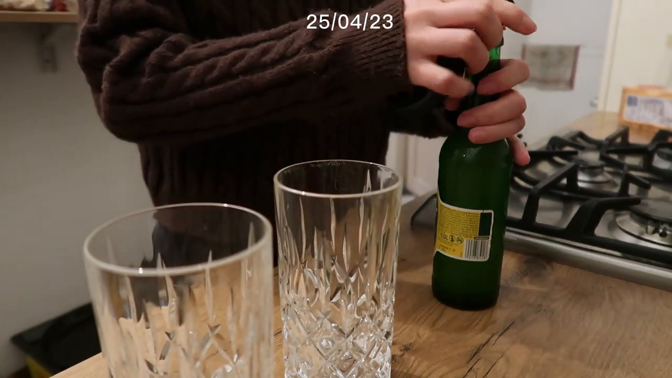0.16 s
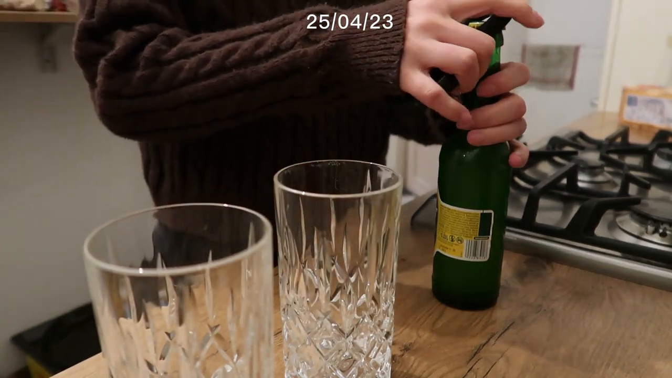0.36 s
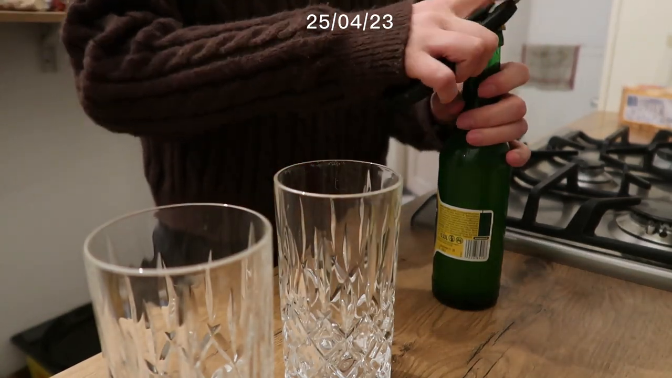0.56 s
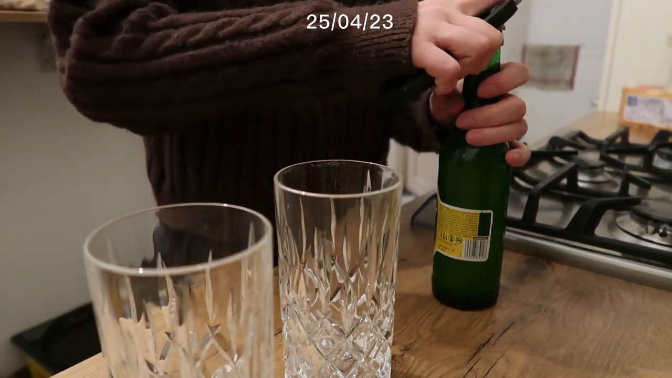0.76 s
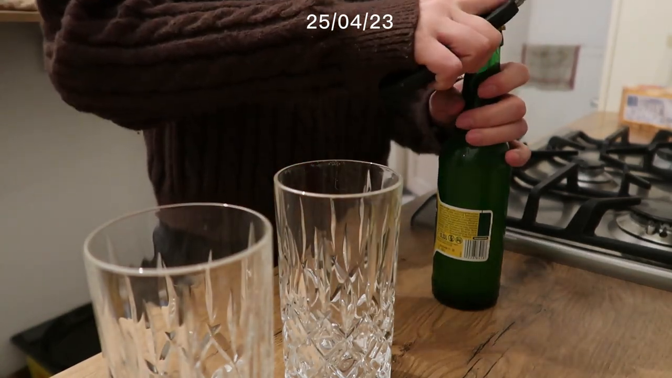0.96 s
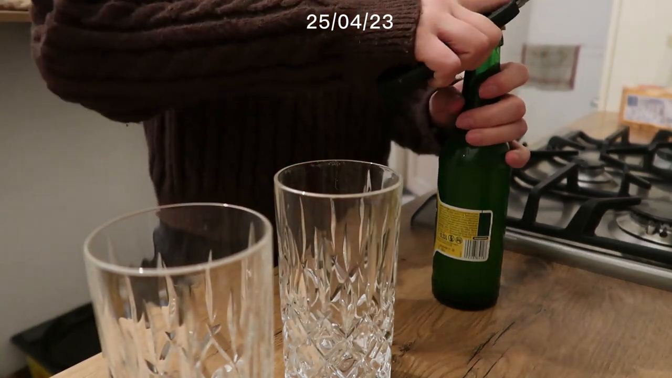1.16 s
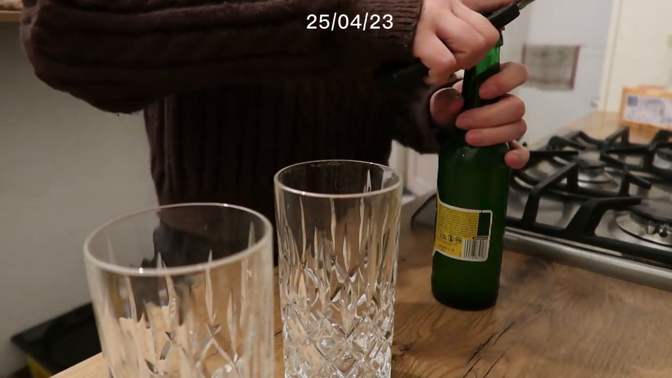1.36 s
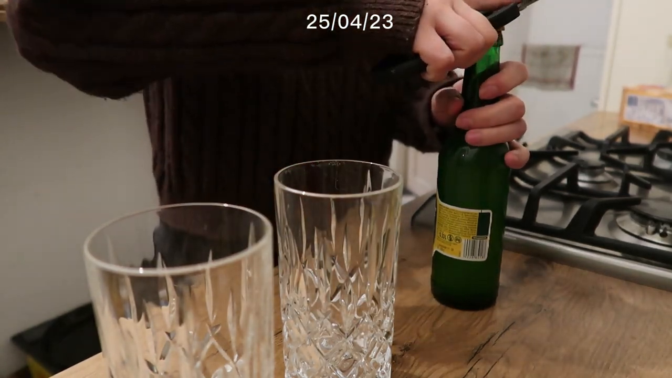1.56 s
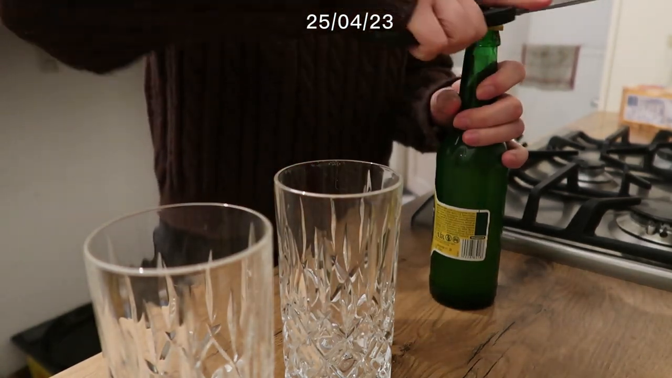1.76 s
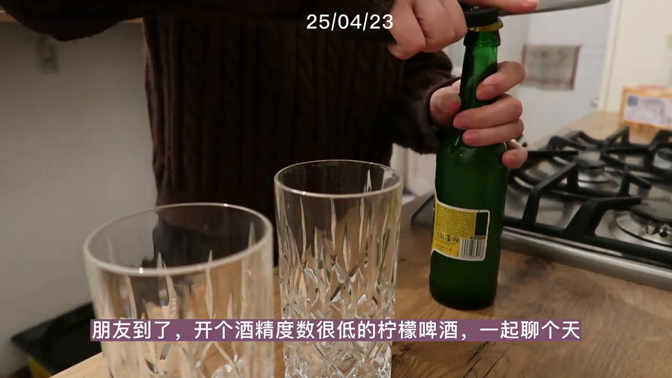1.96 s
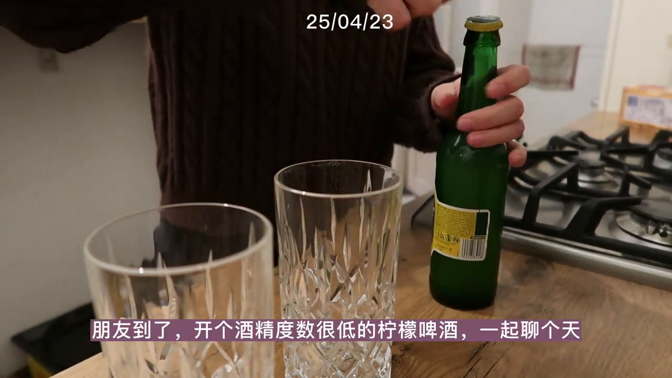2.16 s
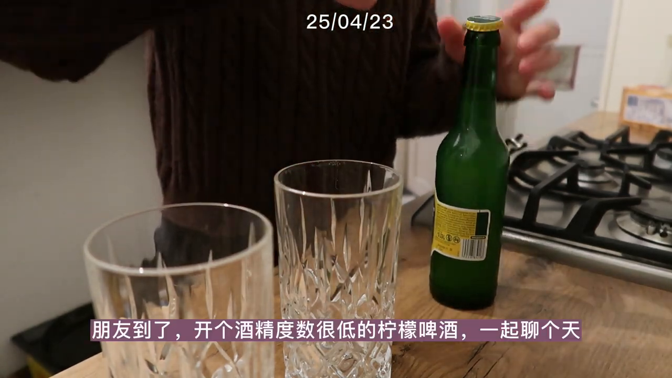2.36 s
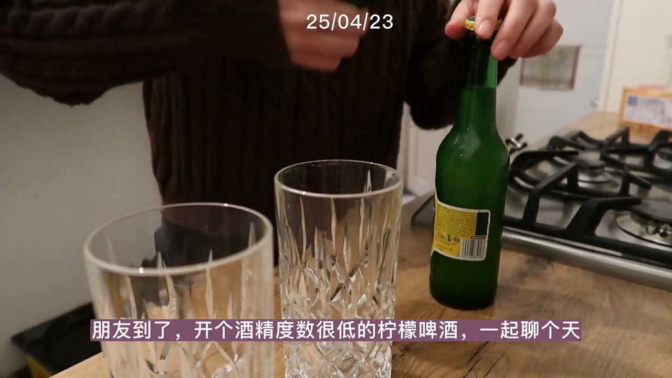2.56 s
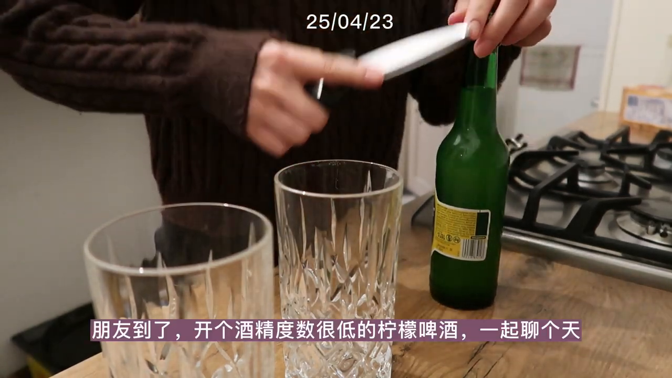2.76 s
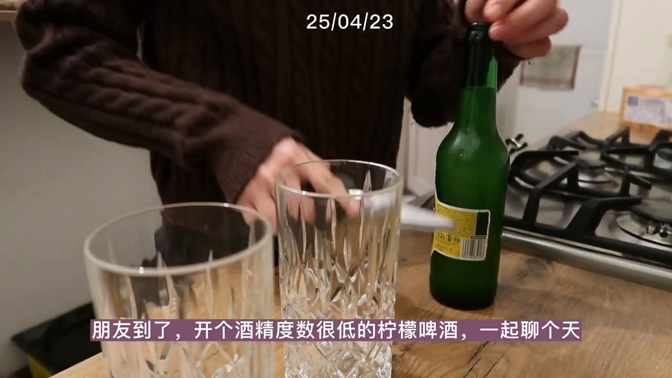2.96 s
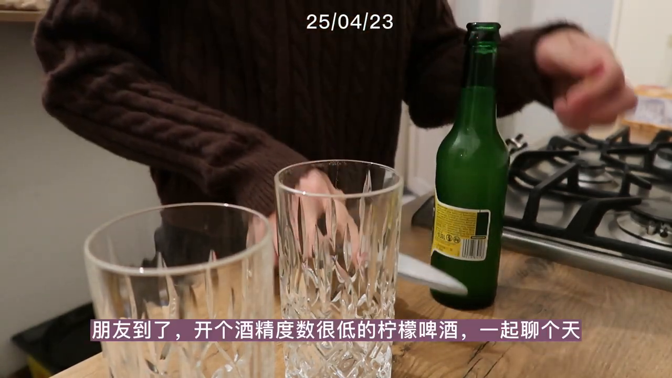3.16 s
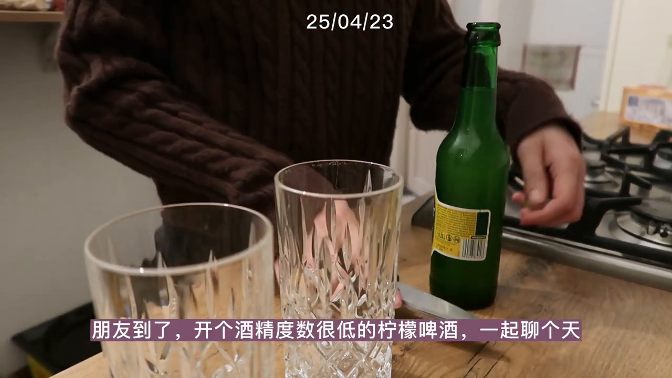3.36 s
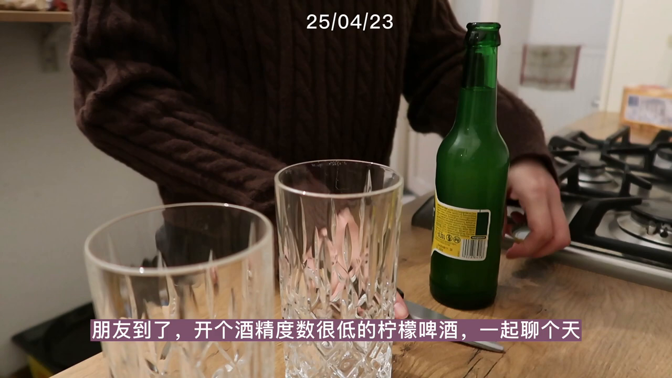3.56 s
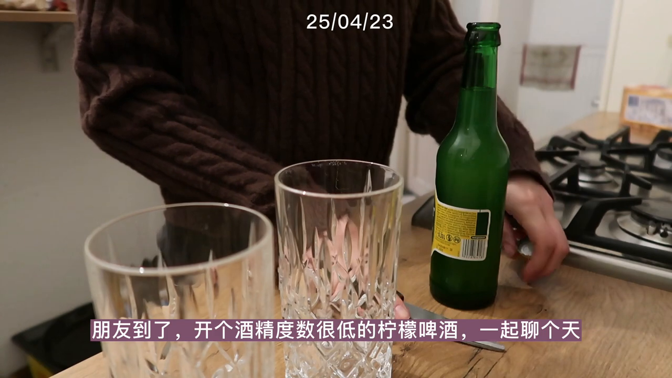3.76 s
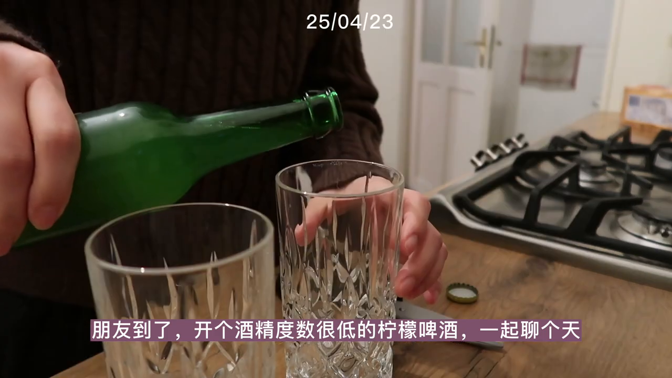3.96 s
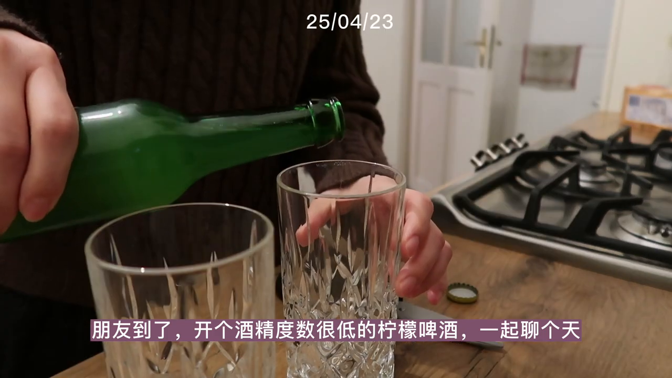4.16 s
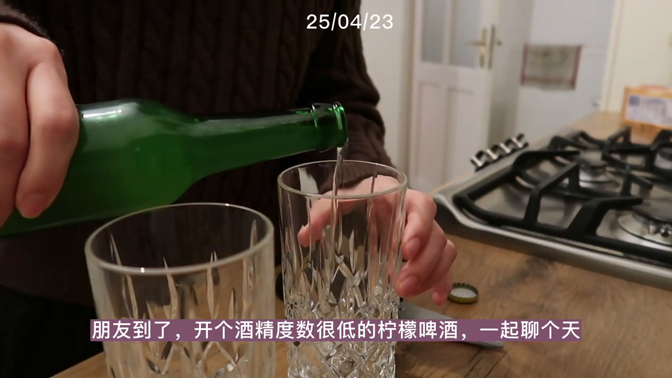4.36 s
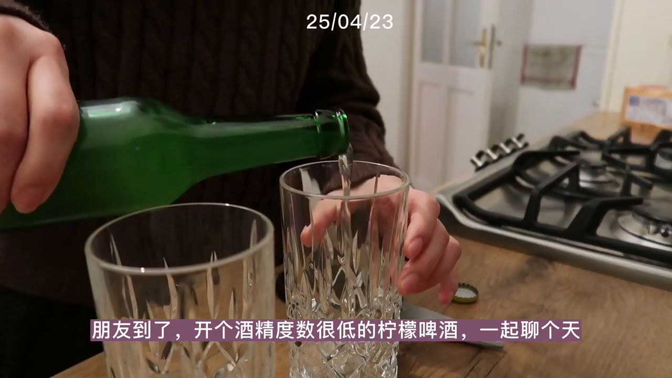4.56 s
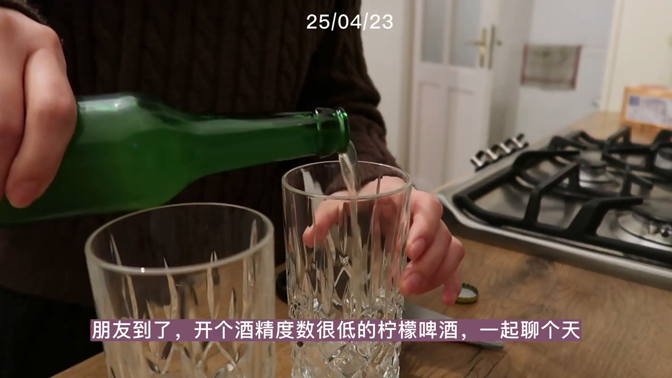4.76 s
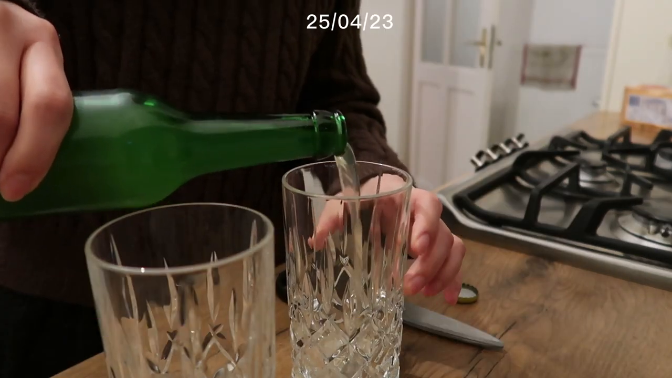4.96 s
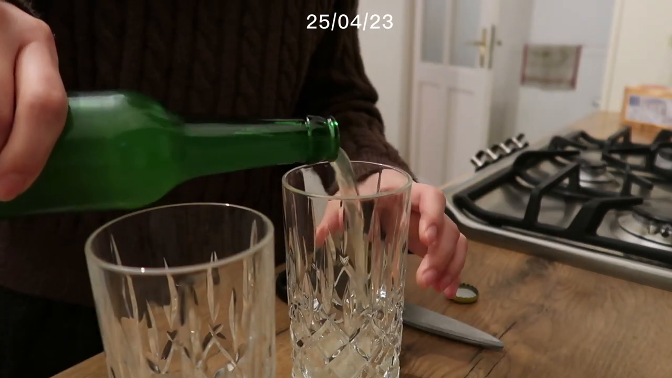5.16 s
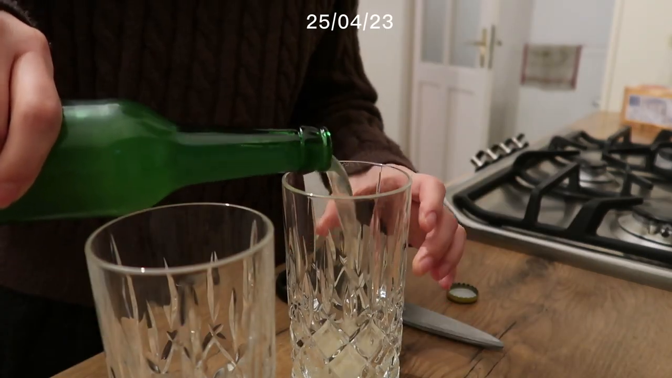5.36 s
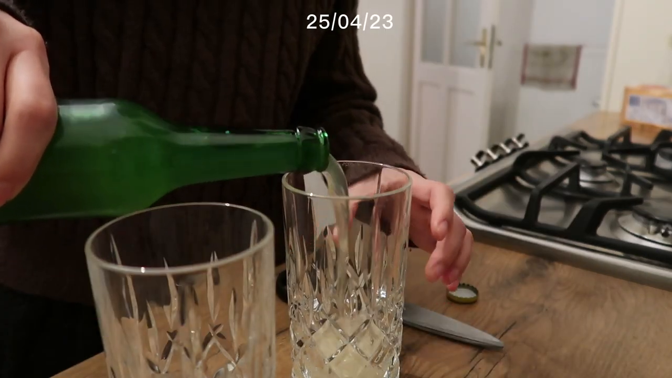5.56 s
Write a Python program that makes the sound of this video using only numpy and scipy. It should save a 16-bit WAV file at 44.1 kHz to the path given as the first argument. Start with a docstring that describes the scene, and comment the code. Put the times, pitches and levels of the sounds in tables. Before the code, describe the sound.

In a quiet kitchen, close stereo pickup: a glass bottle bumps dully on a wooden counter, then the cap is pried loose with a loud woody knock, steel ticks and a tiny gas hiss. After faint rubbing, a knife clatters down and settles. A sudden cut leads to rhythmic glugging into a tall glass, with plops, splashing and light fizz.

```python
"""A beer bottle on a wooden kitchen counter: its crown cap is levered off with a knife, then it glugs into a tall glass.
Opening: wood, steel and cap are struck modes; gas, soft rubbing and the shuffling base are coloured noise.
Pouring: the bottle rings at its neck and hums as an air spring, gulping about four times a second;
the glass holds ringing bubbles, splashing, a crackling trickle and the first fizz of the foam.
Close stereo pickup with a short room reverberation and quiet room noise."""
import sys
import numpy as np
from scipy import signal
from scipy.fft import rfft, irfft, next_fast_len
from scipy.io import wavfile
from scipy.ndimage import uniform_filter1d

SR = 44100
rng = np.random.default_rng(int(sys.argv[2]) if len(sys.argv) > 2 else 0)


def int16_out(signal):
    """Quantize to a 16-bit WAV file."""
    q = np.round(np.clip(np.atleast_2d(signal).T, -1, 1) * 32767)
    wavfile.write(sys.argv[1], SR, q.astype(np.int16))


N = 248283
TIME = np.arange(N) / SR
RING = np.arange(SR * 2 // 5) / SR  # time axis of one short sound, 0.4 s
TOP_HZ = 15300  # upper limit of the pickup

# Air gulped into the neck. Each row: start in seconds, ping level in dB before colouring, neck pitch in Hz,
# second mode in dB, third mode in dB, length in seconds of the whoop after it.
GULPS = [(4.166, -36, 1299, -1, -13, 0.21), (4.397, -35.5, 1400, -2.5, -13, 0.22),
         (4.638, -28.5, 1506, -15, -36, 0.2), (4.8749, -25, 1604, -10, -20.5, 0.21),
         (5.112, -25.5, 1680, -13, -17, .24), (5.353, -30.5, 1732, -7.5, -13, 0.26),
         (5.596, -52, 1760, 7, -16, 0.27)]
# Loudest single bubbles in the glass. Each row: start in seconds, level in dB before colouring, starting pitch in Hz.
LOUD_BUBBLES = [(4.911, -37.5, 4200), (5.0032, -29, 2810), (5.022, -35.5, 2730), (5.05, -41, 2160),
                (5.075, -37.5, 1840), (5.11, -36, 3640), (5.129, -32.5, 1566), (5.148, -30, 4380),
                (5.1734, -32, 2080), (5.172, -32.5, 3280), (5.1762, -35, 2800), (5.187, -28, 1690),
                (5.211, -36, 3630), (5.224, -40, 1300), (5.2378, -37, 1245), (5.2527, -30, 1457),
                (5.26, -36.5, 1580), (5.2824, -34, 1587), (5.284, -40, 3630), (5.29, -40.5, 1048),
                (5.302, -41, 2860), (5.331, -47, 3250), (5.3989, -37, 1690), (5.4583, -31.5, 1700),
                (5.459, -42, 1300), (5.466, -38.5, 1007), (5.4936, -26.5, 1735), (5.501, -59, 1920),
                (5.519, -33.5, 2860), (5.5302, -40, 1860), (5.5305, -46, 2930), (5.5406, -31, 1905),
                (5.601, -40, 2880), (5.598, -31.5, 661), (5.611, -42, 716), (5.6128, -36, 1860)]
# Spectrum of the crackling trickle. Each row: frequency in Hz, level in dB.
TRICKLE_SPECTRUM = [(700, -11), (1500, 4), (2400, 7), (3300, 8), (6000, -16), (12000, -37)]
# Modes of the wooden counter. Each row: frequency in Hz, level in dB, t60 in seconds.
COUNTER_MODES = [(71.7, -6, 0.34), (113, 4, 0.27), (154, 1.5, 0.12), (171.7, 0.5, 0.26), (228.8, 0.5, 0.2),
                 (292, -1.5, 0.18), (400, -5, 0.038), (496, -7, 0.2), (559, -6, 0.18), (644, 0.5, 0.094),
                 (686, -13.5, 0.025), (750, -6.5, 0.23), (1300, 1, 0.019), (1407, 5, 0.018),
                 (2500, 2, 0.023)]
# Spectrum of a thud on the wood. Each row: frequency in Hz, level in dB.
THUD_SPECTRUM = [(25, -6), (62, -6.5), (100, 11), (280, -4.5), (420, -6), (680, 0), (920, -19.5),
                 (1400, -14.5), (2900, -17), (4500, -31.5), (12000, -25)]
# Spectrum of a tick on blade or cap. Each row: frequency in Hz, level in dB.
TICK_SPECTRUM = [(300, -11), (800, 10.5), (1900, 0.5), (3100, 7.5), (4300, -3.5), (8000, -14.5),
                 (12500, -20), (15500, -54)]


def amp(db):
    """Decibels to gain."""
    return 10 ** (np.asarray(db) / 20)


def unit(x):
    """Scale to rms 1."""
    return x / np.sqrt(np.mean(x ** 2))


def fade(t, t60):
    """Exponential decay, 60 dB down after t60 seconds."""
    return np.exp(-np.log(1000) * t / t60)


def swell(strokes):
    """Gain from (s, dB, attack s, hold s, t60 s) rows: each rises, holds and dies away."""
    gain = np.zeros(N)
    for s, db, attack_s, hold_s, t60 in strokes:
        age = TIME - s
        rise = np.clip(age / attack_s, 0, 1) ** 2
        gain += amp(db) * rise * fade(np.maximum(age - attack_s - hold_s, 0), t60)
    return gain


def along(points, hz):
    """Read (Hz, value) points on a log-frequency axis."""
    f, value = np.transpose(points)
    return np.interp(np.log(np.maximum(hz, 1)), np.log(f), value)


def colour(x, points, turn=1):
    """Give x a (Hz, dB) spectrum; turn = 1j adds a quarter cycle."""
    size = next_fast_len(len(x), True)
    gain = amp(along(points, np.fft.rfftfreq(size, 1 / SR)))
    return irfft(rfft(x, size) * turn * gain, size)[:len(x)]


def causal(x, points):
    """Give x a (Hz, dB) spectrum with no ringing ahead of its attack (minimum phase)."""
    gain = amp(along(points, np.fft.rfftfreq(len(x), 1 / SR)))
    cepstrum = irfft(np.log(gain), len(x))
    cepstrum[1:len(x) // 2] *= 2
    cepstrum[len(x) // 2 + 1:] = 0
    return irfft(rfft(x) * np.exp(rfft(cepstrum)), len(x))


def add(track, s, sound):
    """Mix a sound into the track at time s."""
    i = int(np.clip(s * SR, 0, N - 1))
    track[i:i + len(sound)] += sound[:N - i]


def stereo(mid, side):
    """Left and right from mid and side."""
    return np.array([mid + side, mid - side])


def glugs(open_s=0.0081, rise_s=0.0003, overtone_t60=0.024, sag=0.061,
          slap_db=-17, slap_t60=0.057, gurgle_db=-15, gurgle_t60=.11):
    """Each gulp rings the neck air briefly; pitch sags as beer closes it, and churning beer blurs the ring."""
    second_ratio, third_ratio = 2.335, 3.7  # neck modes over the first
    # What the bottle mouth radiates. Each row: frequency in Hz, level in dB.
    mouth_spectrum = [(25, -15), (90, 7), (4200, -1.5), (6500, -8), (9000, -9), (15000, -14)]
    slap_spectrum = [(100, 39.5), (600, 26.5), (2000, 23.0), (6000, 1), (12000, -32)]  # (Hz, dB)
    out = np.zeros(N)
    t = RING[:SR // 10]
    closing = np.minimum(t / open_s, 1)
    for s, db, first_hz, second_db, third_db, _ in GULPS:
        phase = 2 * np.pi * np.cumsum(first_hz * (1 - sag * closing)) / SR
        ping = np.sin(phase) * np.exp(-(t / open_s) ** 4) * (1 - np.exp(-t / rise_s))
        second = amp(second_db) * np.sin(second_ratio * phase)
        third = amp(third_db) * np.sin(third_ratio * phase)
        overtones = (second + third) * fade(t, overtone_t60)
        slap = unit(colour(rng.standard_normal(len(t)), slap_spectrum)) * fade(t, slap_t60)
        resonator = signal.iirpeak(first_hz, 6, fs=SR)
        gurgle = unit(signal.lfilter(*resonator, rng.standard_normal(len(t))))
        gurgle = gurgle * fade(t, gurgle_t60) * closing
        gulp = ping + overtones + amp(slap_db) * slap + amp(gurgle_db) * gurgle
        add(out, s, amp(db) * causal(gulp, mouth_spectrum))
    return out


def pockets(steepness=3.93, release_s=0.013, waver_db=2):
    """Bottle air springs under a shrinking plug of beer: a hum that whoops upwards, deeper as the air grows."""
    first_top_hz, sweep_ratio = 400, 3.0  # end of the first whoop; end pitch over start pitch
    air_per_gulp = 0.929  # air added by each gulp, as a share of the air at first
    first_db, loss_db = -39, 0.55  # level before swell and pitch level; loss per gulp
    swell_db = 5.5  # the whoop grows as the plug thins
    # Level of the hum at each pitch; the deepest pitches sound faint. Each row: frequency in Hz, level in dB.
    pitch_level = [(55, -27), (70, -10.5), (92, 0), (140, -2.5), (170, -2), (240, -1), (400, 0)]
    out = np.zeros(N)
    for gulps, (s, *_, length) in enumerate(GULPS):
        top_hz = first_top_hz / np.sqrt(1 + air_per_gulp * gulps)
        thinning = np.minimum(RING / length, 1) ** steepness
        hz = top_hz / (sweep_ratio - (sweep_ratio - 1) * thinning)
        level_db = first_db - loss_db * gulps + swell_db * (thinning - 1.0) + along(pitch_level, hz)
        release = np.exp(-(np.maximum(RING - length, 0) / release_s) ** 2)
        add(out, s, amp(level_db) * release * np.sin(2 * np.pi * np.cumsum(hz) / SR))
    slosh_spectrum = [(15, -16.0), (30, 19.0), (120, -26), (500, -120)]  # (Hz, dB)
    slosh = unit(colour(rng.standard_normal(N), slosh_spectrum))  # the beer rocks in the bottle
    return out * amp(waver_db * slosh)


def bubble(hz, cycles, glide):
    """A damped sine that swells as the bubble pinches off; its pitch rises as it nears the surface."""
    pinch_cycles = 1  # time constant of reaching full swing
    t = RING[:int(2 * cycles / hz * SR)]
    age = t * hz / cycles
    tone = np.sin(2 * np.pi * hz * t * (1 + glide * age / 2))
    return tone * fade(age, 2.76) * (1 - np.exp(-t * hz / pinch_cycles))


def plops(scatter_s=0.0049, satellite_db=-15, octaves=0.31, cycles=15, count=12):
    """Each trapped bubble rings and sheds a few smaller or larger ones within milliseconds."""
    out = np.zeros(N)
    for s, db, hz in LOUD_BUBBLES:
        add(out, s, amp(db) * bubble(hz, cycles=20, glide=0.031))
        for delay, pitch, size in rng.standard_normal((count, 3)):
            satellite = bubble(hz * 2 ** (octaves * np.clip(pitch, -2, 2)), cycles, glide=0.16)
            add(out, s + scatter_s * delay ** 2, amp(db + satellite_db) * size * satellite)
    return colour(out, [(300, -20.0), (900, -0.5), (5000, -0.5), (12000, -10)])


def grains(rate, spread_db):
    """Tiny contacts at random, rate per second, a few much stronger than the rest; rms 1."""
    chance, sign, size = rng.random(N), rng.choice([-1, 1], N), rng.standard_normal(N)
    return unit((chance < rate / SR) * sign * amp(spread_db * np.clip(size, -2, 2)))


def spatter(level_db=-18, t60=.04):
    """The beer that traps each bubble also smacks the surface: a short, broad crackle."""
    bursts = [(s, db + level_db, 1 / SR, 0, t60) for s, db, hz in LOUD_BUBBLES]
    return unit(colour(grains(rate=2900, spread_db=7), TRICKLE_SPECTRUM)) * swell(bursts)


def strays(level_db=-45, spread_db=-1.0, low_hz=1000, high_hz=2300, start_s=5.18, count=36):
    """Lesser bubbles ring at random once beer covers the bottom of the glass."""
    out = np.zeros(N)
    for when, pitch, size in rng.random((count, 3)):
        ring = bubble(low_hz * (high_hz / low_hz) ** pitch, cycles=12.3, glide=0.063)
        strength = amp(level_db + spread_db * (2 * size - 4.5))
        add(out, start_s + when * (N / SR - start_s), strength * ring)
    return out


def froth(low_hz, high_hz, cycles, spread_db, spectrum, count):
    """A crowd of small bubbles of random size during the pour; rms 1."""
    out, start = np.zeros(N), GULPS[0][0]
    for when, pitch, size, life in rng.random((count, 4)):
        strength = amp(spread_db * -np.log(.02 + size))
        ring = bubble(low_hz * (high_hz / low_hz) ** pitch, cycles * (.5 + life), glide=0.12)
        add(out, start + when * (N / SR - start), strength * ring)
    out = colour(out, spectrum)
    return out / np.std(out[int(start * SR):])


def stream():
    """Gain of the splashing: it builds as beer pools in the glass, then holds, surging once for each gulp."""
    full_db, full_s, rise_db_per_s = -55, 5.23, 101
    surge_db, surge_lag_s = 1.5, 0.076  # swing either way; delay after each gulp
    gulps = np.interp(TIME - surge_lag_s, [row[0] for row in GULPS], np.arange(len(GULPS)))
    build_db = -rise_db_per_s * np.maximum(full_s - TIME, 0)
    return amp(full_db + build_db + surge_db * np.cos(2 * np.pi * gulps))


def splashing():
    """The stream breaks into many bubbles: a splash and a crisper, shorter-ringing trickle."""
    # Spectrum of the splash. Each row: frequency in Hz, level in dB.
    splash_spectrum = [(200, 7), (450, 7.5), (640, -3), (830, -33), (1250, -10), (1750, 7), (2400, -19),
                       (3400, -16), (5000, -7), (8000, -14)]
    splash = froth(597, 6720, cycles=15, spread_db=4, spectrum=splash_spectrum, count=3600)
    trickle = froth(910, 13000, cycles=3, spread_db=3, spectrum=TRICKLE_SPECTRUM, count=1800)
    return (splash + amp(-5) * trickle) * stream()


def fizz(octaves=0.237, spread_db=2.5, cycles=55, count=70):
    """Each flare is a spray of tiny droplets and bubbles of about one size; a few tick out sharply."""
    # Foam flaring up in the glass. Each row: start in seconds, level in dB before colouring,
    # central pitch of its bubbles in Hz, length in seconds.
    flares = [(4.715, -67, 7350, 0.014), (4.73, -67, 13700, 0.024), (4.887, -56, 12400, 0.017),
              (4.902, -57, 9000, 0.023), (4.969, -59, 14900, 0.025), (4.997, -69, 11600, 0.025),
              (5.009, -53, 6960, 0.013), (5.127, -58.5, 6000, 0.049), (5.143, -56, 12200, 0.034),
              (5.209, -64.5, 12800, .035), (5.256, -69.5, 10600, 0.066), (5.35, -74, 8050, 0.033),
              (5.436, -61.5, 13200, 0.029), (5.447, -65.5, 7140, 0.025)]
    # Spectrum of the foam. Each row: frequency in Hz, level in dB.
    foam_spectrum = [(2500, 6), (5000, -3), (7000, -2), (12000, -10), (14000, -14), (15500, -19)]
    out = np.zeros(N)
    for s, db, centre_hz, length in flares:
        spray = np.zeros(N)
        for when, pitch, size in zip(rng.gamma(2, .5, count), rng.standard_normal(count), rng.random(count)):
            ring = bubble(min(centre_hz * 2 ** (octaves * pitch), SR * .4), cycles, glide=0.029)
            add(spray, when * length, amp(-spread_db * np.log(.03 + size)) * ring)
        add(out, s, amp(db) * spray * np.sqrt(2 * length * SR / np.sum(spray ** 2)))
    return colour(out, foam_spectrum)


def pour():
    """The glugging bottle, and in the glass plops, splashing, a crackling trickle and fizz."""
    glass = plops() + spatter() + strays() + splashing()
    bottle = room(glugs(), wet_db=-11) + room(pockets(), wet_db=-9)
    return bottle + room(glass, wet_db=-7.5) + room(fizz(), wet_db=-9)


def blows(events, modes, spectrum, push_db, crack_db, crack_t60, tail_db, tail_t60, tail_top_hz,
          focus_db, focus_octaves, split):
    """Each blow gives a pressure pulse, a crack and ringing modes; the contact dulls it and favours one region."""
    out = np.zeros(N)
    hz, db, t60 = np.transpose(modes)
    grid_hz = np.geomspace(30, SR / 2, num=384)
    pulse = causal(1. * (RING == 0), spectrum)
    decays = fade(RING, t60[:, None])
    strengths = np.resize([1, -1], len(hz)) * amp(db)
    treble_cut = signal.butter(1, tail_top_hz, fs=SR, output="sos")
    for s, level_db, bright_hz, focus_hz in events:
        favour_db = focus_db * np.exp(-(np.log2(grid_hz / focus_hz) / focus_octaves) ** 2)
        contact_db = favour_db - 10 * np.log10(1 + (grid_hz / bright_hz) ** 4)
        # each mode is a close cluster of three partials, slightly detuned at random for each blow
        detuned = hz * (1 + split * rng.standard_normal((3, len(hz))))
        clusters = np.sin(np.float32(2 * np.pi * detuned[..., None] * RING)).sum(axis=0) / 3.74
        ring = strengths @ (clusters * decays)
        crack, tail = rng.standard_normal((2, len(RING)))
        tail = signal.sosfilt(treble_cut, tail)  # the treble dies first
        rattle = amp(crack_db) * crack * fade(RING, crack_t60) + amp(tail_db) * tail * fade(RING, tail_t60)
        push = amp(push_db) * pulse / np.max(np.abs(pulse))
        hit = ring + causal(rattle, spectrum) / np.linalg.norm(pulse) + push
        hit = causal(hit, np.column_stack([grid_hz, contact_db]))
        add(out, s, amp(level_db) * hit / (2 * np.std(hit[:SR // 100])))  # level set over the first 10 ms
    return out


def bumps():
    """Bottle, hands and finally the knife bump the counter, and the wood answers with its damped modes."""
    # Each row: start in seconds, level in dB, contact brightness in Hz, most excited frequency in Hz.
    contacts = [(0.004, -28.5, 680, 186), (0.02, -32, 330, 188), (0.27, -41, 300, 134),
                (0.294, -39.5, 400, 216), (0.428, -39, 905, 312), (0.468, -44, 600, 235),
                (0.681, -42, 205, 105), (0.725, -50, 254, 130), (1.03, -53, 218, 113),
                (1.8035, -20.5, 2500, 584), (1.812, -13, 3400, 244), (1.8235, -16, 1730, 312),
                (1.8245, -29.5, 110, 71.4), (1.829, -29, 900, 109), (1.8302, -23.5, 1500, 684),
                (1.8525, -31, 1810, 633), (1.861, -21, 1000, 197), (1.8625, -24, 1500, 750),
                (1.947, -27, 700, 235), (1.956, -26, 400, 230), (1.985, -34, 497, 155),
                (2.9505, -40.5, 1760, 273), (2.951, -41, 1500, 645), (2.968, -50, 900, 228),
                (3.675, -42.5, 295, 187), (3.701, -34.5, 222, 130)]
    return blows(contacts, COUNTER_MODES, THUD_SPECTRUM, push_db=15.5, crack_db=3.0, crack_t60=0.078,
                 tail_db=1.0, tail_t60=0.2, tail_top_hz=6000, focus_db=9.5, focus_octaves=0.43, split=0.0046)


def shuffle():
    """The bottle's base shifts on the wood under the hand: low coloured noise."""
    # Each row: start in seconds, level in dB, attack in seconds, hold in seconds, t60 in seconds.
    shifts = [(0, -31, 0.00064, 0.0065, 0.11), (0.12, -48, 0.025, 0.054, 0.51),
              (0.4, -52, 0.085, 0.018, 0.42), (0.62, -54.5, 0.047, 0.018, 1.5),
              (2.17, -56.5, 0.087, 0.11, 0.68)]
    # Spectrum of the shuffle. Each row: frequency in Hz, level in dB.
    base_spectrum = [(30, -17), (70, 12.5), (120, 10), (230, 1), (330, -9.5), (550, -13), (1000, -46),
                     (4000, -50)]
    return unit(colour(rng.standard_normal(N), base_spectrum)) * swell(shifts)


def blade():
    """The knife blade slips against the cap and rings at its steel modes."""
    # Each row: start in seconds, level in dB, contact brightness in Hz, most excited frequency in Hz.
    slips = [(1.404, -54.5, 5500, 2000), (1.8035, -30, 5000, 2720), (1.812, -26, 4030, 3070),
             (1.8135, -43, 2200, 1300), (1.8235, -35, 3000, 2160), (1.8445, -34, 5500, 3020),
             (1.8525, -26, 2180, 1450), (1.939, -31.5, 12000, 5030), (1.9445, -41, 5500, 2900),
             (1.948, -27.5, 14000, 9100), (1.952, -27.5, 1100, 754), (1.987, -29.5, 5500, 3000),
             (1.9885, -35.5, 990, 838), (2.005, -40, 900, 805)]
    # Modes of the blade. Each row: frequency in Hz, level in dB, t60 in seconds.
    blade_modes = [(780, -12, 0.23), (838, -4, 0.19), (1219, -6, .2), (2830, -2, 0.25), (2950, -6, 0.09),
                   (4100, -1.5, 0.16), (4930, -4, .1), (5030, -11, 0.21), (7220, -4.5, 0.17),
                   (7500, -23, 0.17), (9100, -13, 0.15), (9640, -19, .18), (13200, -17, .1)]
    return blows(slips, blade_modes, TICK_SPECTRUM, push_db=10, crack_db=8.5, crack_t60=0.028,
                 tail_db=-14.5, tail_t60=0.13, tail_top_hz=12000, focus_db=11.5, focus_octaves=0.1, split=.009)


def crown_cap():
    """The cap clicks while still gripped, then taps the bottle's lip and is lifted off: high metal modes."""
    # Each row: start in seconds, level in dB, contact brightness in Hz, most excited frequency in Hz.
    taps = [(1.8615, -31, 6000, 3250), (1.863, -26.5, 14000, 10450), (1.8645, -36, 9000, 5100),
            (1.9865, -31, 5000, 3000), (2.004, -32, 11300, 12150), (2.0055, -42, 6000, 5100),
            (2.712, -52, 7000, 2950), (2.722, -58.5, 7000, 4490), (2.745, -56, 12000, 12100),
            (2.747, -57.5, 5000, 3400)]
    # Modes of the cap. Each row: frequency in Hz, level in dB, t60 in seconds.
    cap_modes = [(2846, -1.5, 0.17), (2810, 5.5, 0.075), (3250, -5, 0.12), (3400, -7, 0.28),
                 (4490, -18, 0.13), (5100, -17, 0.31), (5776, -26, .11), (6400, -14, 0.072),
                 (7400, -12, .16), (9270, -14, 0.2), (10800, -20, 0.17), (11200, -25, .14),
                 (12200, -9, 0.084), (12000, -7, 0.071), (12520, -23, .08)]
    return blows(taps, cap_modes, TICK_SPECTRUM, push_db=7, crack_db=6, crack_t60=.021,
                 tail_db=-18, tail_t60=.13, tail_top_hz=12000, focus_db=10, focus_octaves=.06, split=.008)


def escaping_gas():
    """Gas leaves the neck, a leak and then the burst: turbulent noise."""
    # Each row: start in seconds, level in dB, attack in seconds, hold in seconds, t60 in seconds.
    puffs = [(1.79, -56, 0.065, .01, 0.23), (1.931, -41.5, 0.011, 0.0078, 0.14)]
    # Spectrum of the gas. Each row: frequency in Hz, level in dB.
    gas_spectrum = [(500, -22), (1500, -4), (3000, -4), (5200, -1), (7500, -19), (9500, -14), (13000, -8),
                    (15500, -33)]
    return unit(colour(rng.standard_normal(N), gas_spectrum)) * swell(puffs)


def laid_knife():
    """The knife is laid on the counter and bounces, ringing at its modes."""
    # Each row: start in seconds, level in dB, contact brightness in Hz, most excited frequency in Hz.
    knocks = [(3.7008, -27, 8500, 2320), (3.7022, -27.5, 9000, 3540), (3.7025, -16.5, 1300, 655),
              (3.7115, -21, 1100, 727), (3.7265, -14.5, 8000, 1965), (3.7285, -29.5, 1510, 940),
              (3.734, -25, 2930, 1040), (3.7555, -46, 2500, 1240), (3.768, -39, 2500, 2000),
              (3.794, -45, 2200, 910), (3.817, -45, 3000, 2000)]
    # Modes of the knife. Each row: frequency in Hz, level in dB, t60 in seconds.
    knife_modes = [(573, -27, .1), (660, 10, 0.065), (752, 5.5, 0.19), (870, -11, 0.12), (1033, -6, 0.22),
                   (1140, 0, 0.4), (1350, 4, 0.44), (1780, -4, 0.021), (1985, -4, 0.21), (2104, 0, 0.08),
                   (2383, 9.5, 0.12), (3580, -6.5, 0.095), (4080, 0, 0.087), (4600, -1, 0.04),
                   (5130, -6, 0.093)]
    # Spectrum of the crack on contact. Each row: frequency in Hz, level in dB.
    crack_spectrum = [(150, -22), (450, -16.5), (720, 0), (1200, -1), (1550, -8), (2050, -6.5),
                      (2900, -10.5), (4100, -25), (5400, -25), (8000, -37), (15000, -46)]
    return blows(knocks, knife_modes, crack_spectrum, push_db=25.0, crack_db=15.0, crack_t60=0.037,
                 tail_db=-4, tail_t60=0.12, tail_top_hz=3000, focus_db=13.5, focus_octaves=0.22, split=0.012)


def handle(count=3):
    """The handle follows the blade down and bounces on the wood: short, dull thumps, each weaker."""
    first_s, first_db, bright_hz, focus_hz = 3.7315, -21, 330, 152
    spacing_s, loss_db = .055, 8  # per bounce
    bounces = [(first_s + k * spacing_s, first_db - k * loss_db, bright_hz, focus_hz) for k in range(count)]
    return blows(bounces, COUNTER_MODES, THUD_SPECTRUM, push_db=24, crack_db=-2, crack_t60=0.05,
                 tail_db=-18, tail_t60=0.21, tail_top_hz=2000, focus_db=10, focus_octaves=0.4, split=.005)


def chatter():
    """Blade and handle rattle on the wood as the knife settles: a dense run of small contacts."""
    # Each row: start in seconds, level in dB, attack in seconds, hold in seconds, t60 in seconds.
    runs = [(3.727, -35, .004, 0.016, 0.81)]
    # Spectrum of the chatter. Each row: frequency in Hz, level in dB.
    rattle_spectrum = [(300, -21), (560, -9), (760, 0.5), (1330, 2), (1550, -11), (2000, 1.5), (2450, -13),
                       (3300, -14), (3650, -24), (4050, -18), (4500, -32), (5300, -29), (10000, -59)]
    return unit(colour(grains(rate=1500, spread_db=1), rattle_spectrum)) * swell(runs)


def soft_rubbing():
    """Soft rubbing noise: mostly the sleeve, with a brief scrape and the knife faintly sliding."""
    # Each row: start in seconds, level in dB, attack in seconds, hold in seconds, t60 in seconds.
    rubs = [(0, -57.5, 0.0024, 0.012, 0.45), (0.258, -48, 0.024, 0.073, 0.55),
            (1.388, -58, 0.012, .01, 0.1), (2.78, -59, 0.064, 0.18, 0.63), (2.99, -62.5, 0.034, 0.033, .4),
            (3.26, -65, 0.02, 0.9, 1)]
    # Spectrum of the rubbing. Each row: frequency in Hz, level in dB.
    rub_spectrum = [(200, 12), (800, 6.5), (1300, 9.5), (2350, 3.5), (3500, -5), (6000, -16), (12000, -38)]
    roughness = amp(2.0 * unit(uniform_filter1d(rng.standard_normal(N), size=110)))
    return unit(colour(rng.standard_normal(N) * roughness, rub_spectrum)) * swell(rubs)


def opening():
    """Bottle on wood, steel on cap, escaping gas, soft rubbing, and the knife put down."""
    wood = room(bumps() + handle() + shuffle(), wet_db=-8.0)
    neck = room(blade() + crown_cap() + escaping_gas(), wet_db=-8.5)
    knife = room(laid_knife(), wet_db=-11) + room(chatter(), wet_db=-11.5)
    return wood + neck + knife + room(soft_rubbing(), wet_db=-12.0)


def room(x, wet_db):
    """Direct sound, its side a quarter cycle from its mid, plus the kitchen's short reverberation."""
    # Reverberation time. Each row: frequency in Hz, t60 in seconds.
    room_t60 = [(100, 0.43), (500, 0.38), (2000, 0.36), (6000, 0.36), (14000, 0.19)]
    # Strength of the reverberation. Each row: frequency in Hz, level in dB.
    room_spectrum = [(60, -3), (170, -3), (320, 4), (3000, 0), (5000, 2.5), (14000, -0.5)]
    # Side against mid of the direct sound. Each row: frequency in Hz, ratio in dB.
    direct_side = [(60, -47), (250, -21), (1500, -21.5), (3000, -14.5), (5000, -3), (7000, -2.5),
                   (9000, 6.5), (13000, 3)]
    # Side against mid of the reverberation. Each row: frequency in Hz, ratio in dB.
    diffuse_side = [(60, -26), (120, -45), (220, -37), (400, -27), (1300, -19), (2500, -13), (4400, -6),
                    (8000, 4), (15000, 10)]
    late_db, late_t60_s = -17.5, 0.57  # weak, slower part
    edges_hz = [0, 250, 1000, 3000, 8000, SR / 2]
    hz = np.fft.rfftfreq(len(RING), 1 / SR)
    noise, tail = rfft(rng.standard_normal((2, len(RING)))), 0
    late = amp(late_db) * fade(RING, late_t60_s)
    for low, high in zip(edges_hz, edges_hz[1:]):
        band = irfft(noise * ((hz >= low) & (hz < high)), len(RING))
        tail = tail + band * (fade(RING, along(room_t60, (low + high) / 2)) + late)
    tail = tail * np.clip((RING - .004) / 0.0024, 0, 1)  # the walls answer after a few milliseconds
    send = amp(wet_db) * colour(x, room_spectrum)
    mid, side = (signal.fftconvolve(send, h / np.linalg.norm(h))[:N] for h in tail)
    return stereo(x + mid, colour(x, direct_side, 1j) + colour(side, diffuse_side))


def kitchen(level_db=-58.5):
    """Quiet room noise, its deepest rumble alike on both sides."""
    # Spectrum of the room noise. Each row: frequency in Hz, level in dB.
    noise_spectrum = [(12, -37), (20, -41), (32, -19), (47, 0), (129, 1.5), (180, -3.5), (324, -4.5),
                      (352, -10.5), (439, -5.5), (519, -12), (686, -11.5), (2840, -21), (3960, -24),
                      (12100, -38.5), (15500, -54)]
    # Side against mid of the room noise. Each row: frequency in Hz, ratio in dB.
    noise_side = [(60, -31), (120, -9.5), (220, -3), (400, 0.5), (1800, -2.5), (8000, -0.5), (15000, 4)]
    mid, side = (unit(colour(rng.standard_normal(N), noise_spectrum)) for _ in range(2))
    return amp(level_db) * stereo(mid, colour(side, noise_side))


def scene():
    """The opening fades out quickly and the pour follows, over steady room noise."""
    end_s, fade_s = 3.885, .07
    return opening() * np.clip((end_s - TIME) / fade_s, 0, 1) + pour() + kitchen()


def record(dry):
    """The phone's pickup cuts the top steeply."""
    return signal.sosfilt(signal.ellip(10, .2, 80, TOP_HZ, fs=SR, output="sos"), dry)


dry = scene()
out = record(dry)
int16_out(out)
```